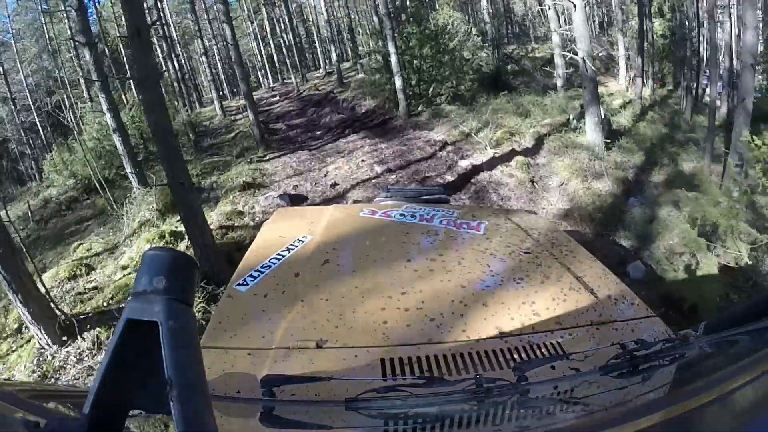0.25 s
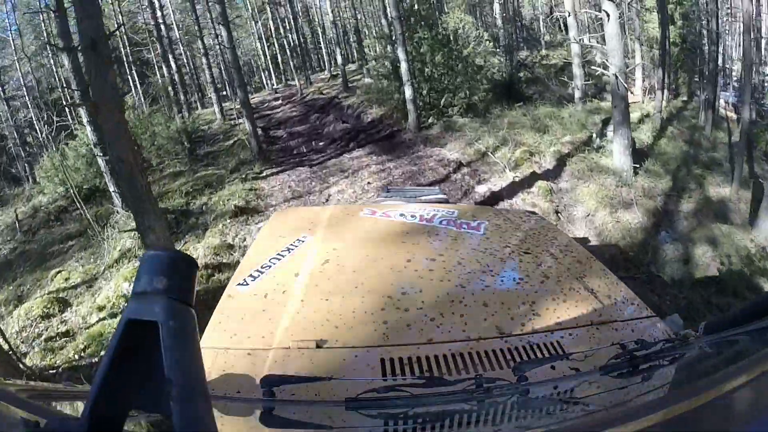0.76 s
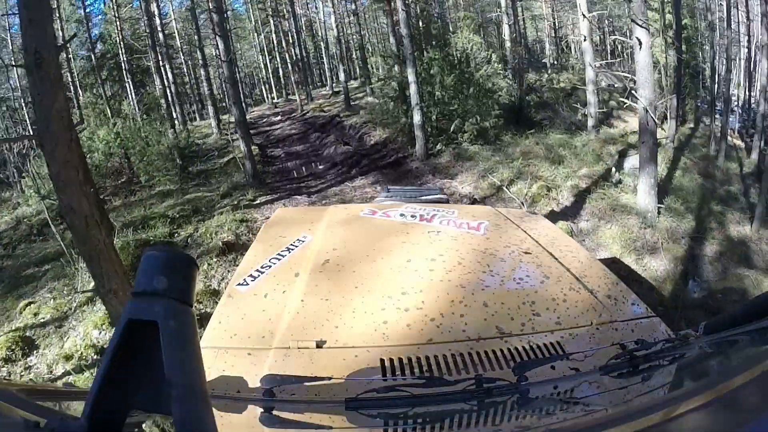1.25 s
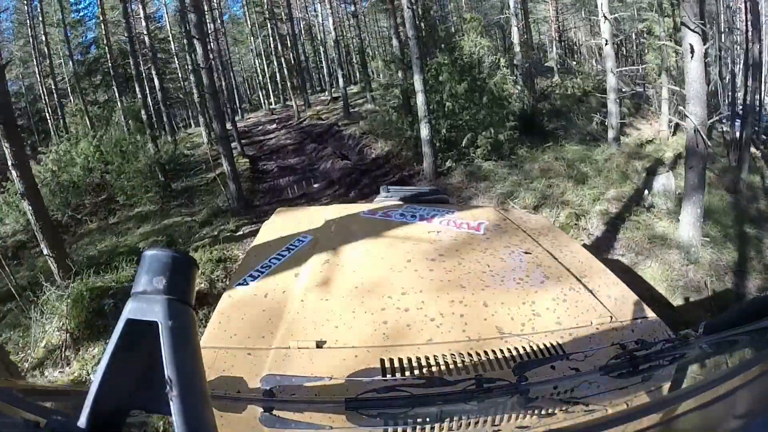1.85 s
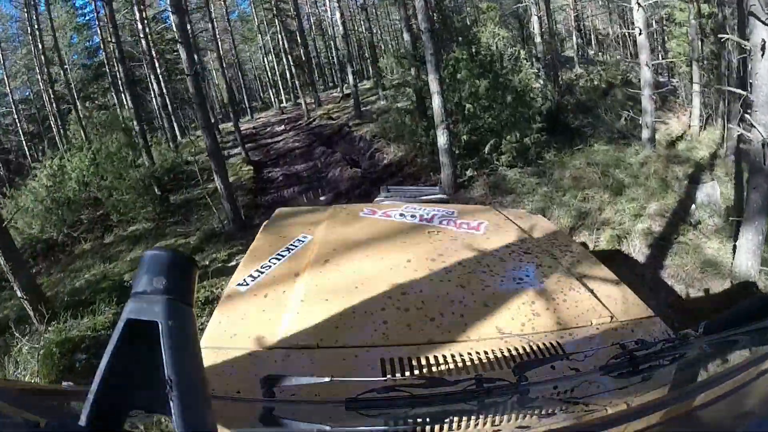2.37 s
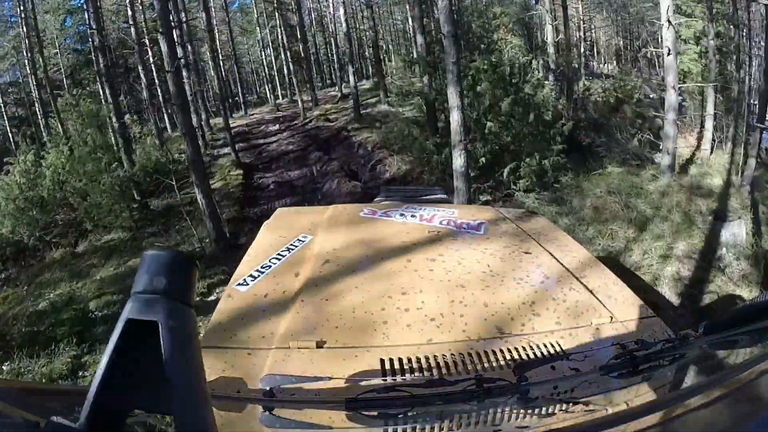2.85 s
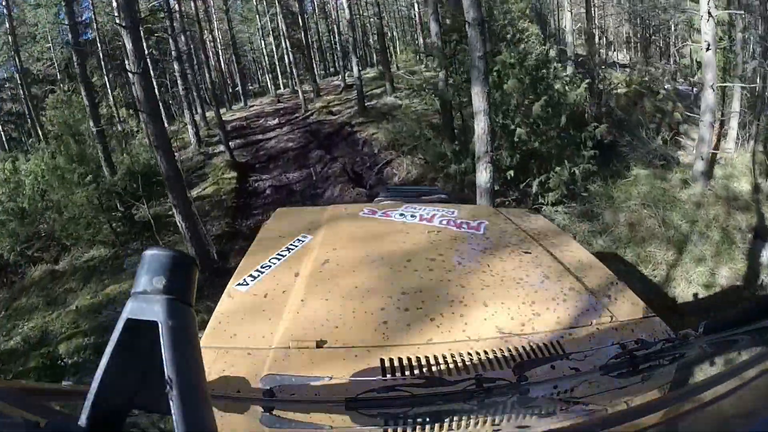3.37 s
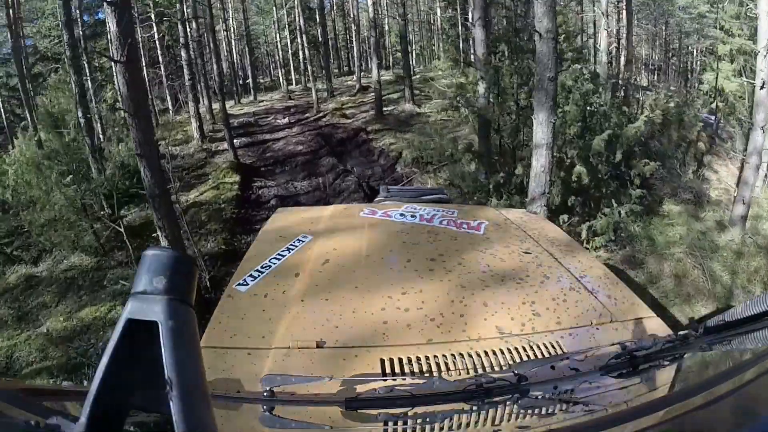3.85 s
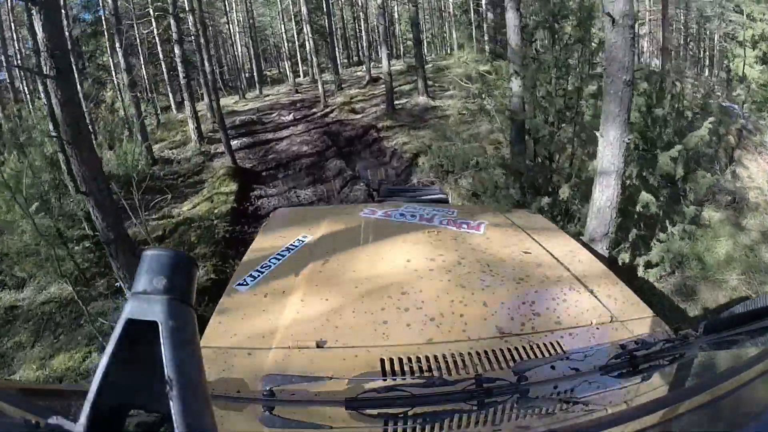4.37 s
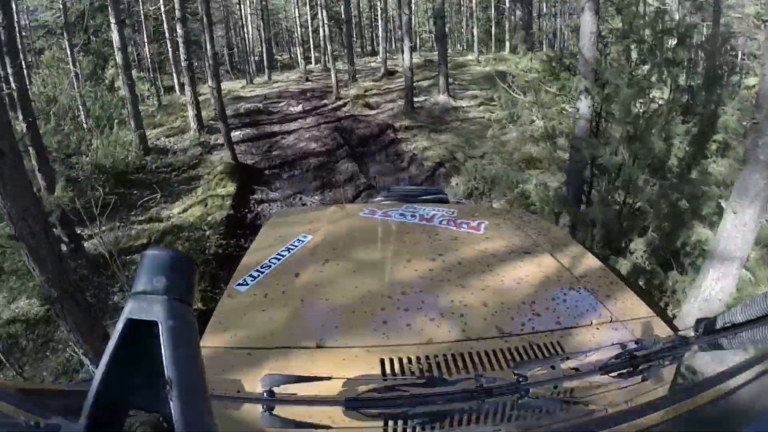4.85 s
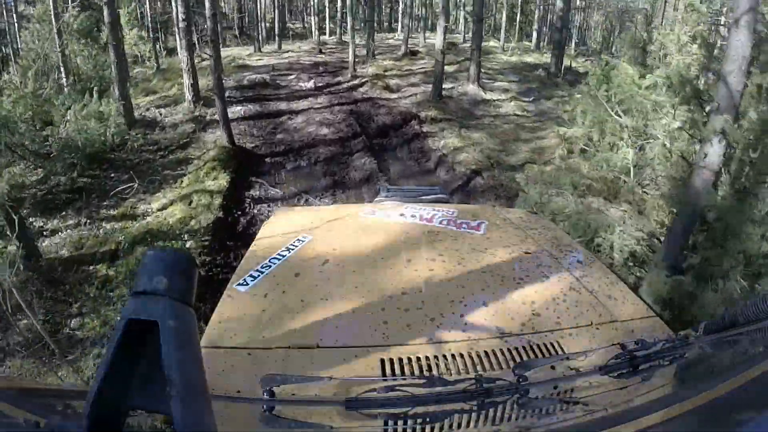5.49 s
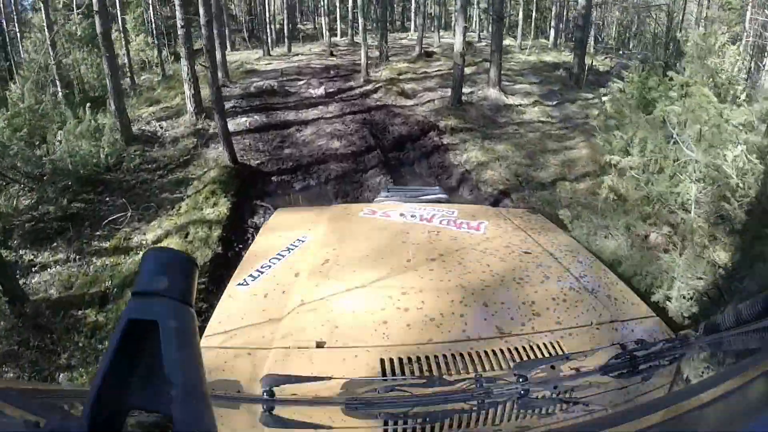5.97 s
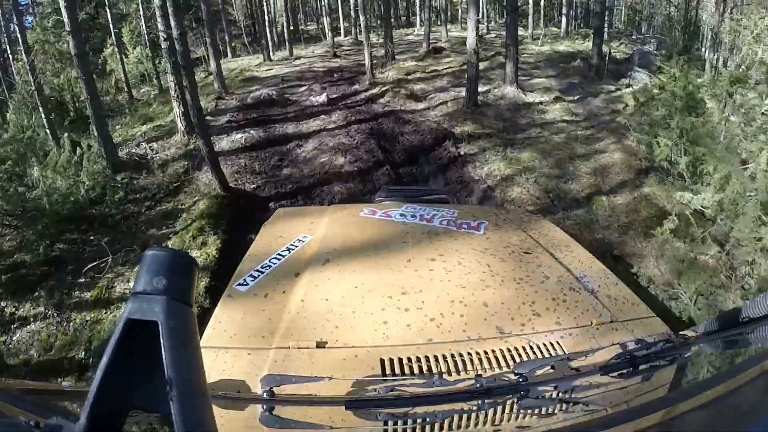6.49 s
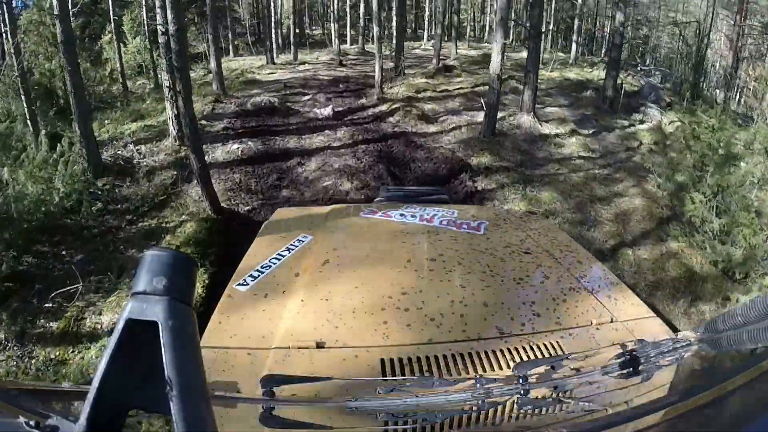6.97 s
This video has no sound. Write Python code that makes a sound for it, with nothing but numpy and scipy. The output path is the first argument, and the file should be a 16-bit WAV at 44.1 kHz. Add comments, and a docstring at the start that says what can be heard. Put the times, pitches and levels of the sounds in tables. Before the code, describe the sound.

Heard close from behind the bonnet, a small four-cylinder engine drones steadily with ticking valves and a light hiss. The body booms over ruts, a fitting rattles and a loose panel knocks, hardest early on and just before four seconds. Brakes sing faintly now and then. Near the end the engine lugs down to a deeper, booming note, then picks up again.

```python
"""A small four-cylinder off-roader crawls along a rutted forest track, heard from behind the bonnet.
From the start the engine drones in sine orders, its valve gear ticks and the cabin booms in shaped noise.
A light fitting rattles and a loose panel knocks and chatters, both as decaying modes; jolts thump low.
Later the brakes sing faintly on wavering sines.
Near the end the engine lugs down into the cabin's resonance, then picks up again."""
import sys
import numpy as np
from scipy import signal
from scipy.fft import rfft, irfft, next_fast_len
from scipy.io import wavfile
from scipy.ndimage import uniform_filter1d, minimum_filter1d, map_coordinates

SR = 44100
rng = np.random.default_rng(int(sys.argv[2]) if len(sys.argv) > 2 else 0)


def generate_wav(sig):
    """Save sig (samples, or channels by samples) to the path in sys.argv[1] as 16-bit PCM at SR."""
    pcm = np.round(np.clip(np.atleast_2d(sig).T, -1, 1) * 32767).astype(np.int16)
    wavfile.write(sys.argv[1], SR, pcm)


N = 318402


def amp(db):
    """Decibels to amplitude."""
    return 10 ** (np.asarray(db) / 20)


def unit(x):
    """x scaled to rms 1."""
    return x / np.sqrt(np.mean(x ** 2) + 1e-20)


def along(points, hz):
    """A spectrum of (Hz, dB) points, interpolated on a log frequency axis."""
    f, v = np.transpose(points)
    return np.interp(np.log(hz + 1), np.log(f + 1), v)


def wobble(rate):
    """A smooth random curve with rate knots a second."""
    knots = rng.standard_normal(int(N * rate / SR) + 4)
    return map_coordinates(knots, [np.arange(N) * rate / SR])


def filtered(x, response):
    """x with its spectrum multiplied by a response of frequency."""
    m = next_fast_len(N + SR // 2)
    hz = np.fft.rfftfreq(m, 1 / SR)
    return irfft(rfft(x, m) * response(hz), m)[:N]


def coloured(x, spectrum, peaks=()):
    """x at rms 1 with a broad spectrum and narrow resonances on top."""
    def response(hz):
        lift_db = sum(db / (1 + (2 * (hz - centre) / width) ** 2) for centre, width, db in peaks)
        return amp(along(spectrum, hz) + lift_db)
    return unit(filtered(x, response))


def blows(times, sizes):
    """A train of impulses."""
    samples = np.clip(np.round(times * SR).astype(int), 0, N)
    return np.bincount(samples, sizes, N + 1)[:N]


def passes(turns, offset):
    """The times at which a count of turns passes each whole number plus offset."""
    return np.interp(np.arange(offset, turns[-1], 1), turns, np.arange(N) / SR)


def tilted(modes, slope_db):
    """The same modes with their balance tilted by slope_db per octave."""
    return [(hz, db + slope_db * np.log2(hz / SR), t60) for hz, db, t60 in modes]


def ring(modes, contact_hz, rise):
    """One blow on a part, peak 1; a softer contact leaves out the high modes."""
    t = np.arange(SR // 8) / SR
    y = sum(amp(db - 60 * t / t60) * np.cos(2 * np.pi * hz * t) for hz, db, t60 in modes)
    # the contact force builds up over rise seconds, so the blow lands as a clunk
    y = y * (1 - np.exp(-t / rise))
    y = signal.sosfilt(signal.butter(6, contact_hz, fs=SR, output="sos"), y)
    return y / np.abs(y).max()


def engine_speed():
    """Firings per second at each moment, sagging near the end as the engine lugs."""
    # engine speed: t/s, firing rate/Hz
    speed_points = [(0, 95.5), (1.25, 95.5), (1.6, 98), (1.95, 104), (2.8, 100), (3.2, 96.2), (3.55, 100.5),
                    (3.9, 96.8), (4.2, 99.5), (4.6, 97.3), (5.3, 88.7), (5.6, 86.7), (6.05, 80),
                    (6.35, 81.2), (6.85, 93), (7.22, 93.5)]
    times, rates = np.transpose(speed_points)
    return np.interp(np.arange(N) / SR, times, rates)


def drone_level(speed):
    """The firing tone grows as its rate nears the cabin resonance; in dB."""
    base_db, cabin_hz, cabin_width_hz, cabin_lift_db = -52, 81.6, 19.7, 21
    # brief swells and dips of the drone: t/s at the centre, length/s, change/dB
    swell_table = [(2.196, 0.15, 11.5), (3.744, 0.35, 11.5), (6.214, 0.19, -4), (6.34, 0.23, 5),
                   (6.459, .08, -26), (6.667, 0.38, 6)]
    t = np.arange(N) / SR
    lift = cabin_lift_db / (1 + (2 * (speed - cabin_hz) / cabin_width_hz) ** 2)
    swells = 0
    for s, length, db in swell_table:
        swells = swells + db * np.cos(np.pi * np.clip((t - s) / length, -.5, .5)) ** 2
    return base_db + lift + swells


def drone(firings, drone_db):
    """A sine just under the firing rate, steadier when loud, and weaker orders from unequal cylinders."""
    # weaker engine orders: multiple of the firing rate, mean level/dB
    order_table = [(.5, -65), (1.5, -67.5), (2, -71), (2.5, -69.5), (3, -68.5), (3.5, -73.5), (4, -85),
                   (4.5, -80)]
    unsteady = np.interp(drone_db, [-46, -33], [1, .35])

    def tone(multiple):
        phase = 2 * np.pi * (multiple * firings + rng.random())
        return np.sqrt(2) * np.sin(phase + 0.11 * unsteady * wobble(11))

    orders = sum(amp(db + 4.0 * wobble(5)) * tone(multiple) for multiple, db in order_table)
    return amp(drone_db + 2 * unsteady * wobble(19)) * tone(0.98) + orders


def at_speed(speed):
    """Murmur, clatter, hiss and rumble in dB at each moment's engine speed."""
    # levels by speed: firing rate/Hz, chassis murmur/dB, valve clatter/dB, belt and fan hiss/dB,
    # spring rumble/dB; murmur and rumble are for smooth ground
    speed_levels = [(80.5, -56.5, -54, -63.5, -70), (89.7, -59, -54, -63.5, -62),
                    (95.7, -56.5, -52.5, -61.6, -58), (105.5, -55.5, -50.5, -59.5, -52.5)]
    rates, *levels = np.transpose(speed_levels)
    return [np.interp(speed, rates, level) for level in levels]


def valves(firings, t60, jitter, count=8):
    """Eight valves seat once a cycle of four firings, each with a decaying noise tick of its own."""
    t = np.arange(SR // 16) / SR
    ticks = np.zeros(N)
    for valve in range(count):
        times = passes(firings / 4, valve / count)
        chance = rng.standard_normal((len(times), 2))
        valve_db = 2 * rng.standard_normal()
        tick = rng.standard_normal(len(t)) * amp(-60 * t / t60 + valve_db)
        seatings = blows(times + jitter * chance[:, 0], amp(1.95 * chance[:, 1]))
        ticks += signal.fftconvolve(seatings, tick)[:N]
    return unit(ticks)


def machinery(firings, murmur_db, clatter_db, hiss_db):
    """Valve ticks and noise that pulses with the engine cycle pass through the bay and the chassis."""
    # spectra before levelling: f/Hz, relative level/dB per Hz
    murmur_spectrum = [(100, -53), (170, -8.5), (210, 3.5), (280, -3), (355, 3), (430, -3), (510, -9.5),
                       (565, 0), (690, 0.5), (760, -9.5), (850, -10), (1100, -10), (2000, -37), (5000, -85)]
    clatter_spectrum = [(300, -33), (800, -28), (1030, -14.5), (1250, 2.5), (1800, 1), (2150, -4),
                        (2650, -2.5), (3100, -8.5), (3500, -5), (3870, -4), (4020, -14.5), (4500, -23.5),
                        (6000, -41.5), (14000, -53)]
    hiss_spectrum = [(2500, -39), (4100, -9), (4480, -10), (4770, -2.5), (5100, -9.5), (5580, -16),
                     (5920, -3), (6330, -2.5), (6700, -13.5), (7050, -16), (8000, -24), (10500, -23.5),
                     (12600, -27), (13400, -34)]
    # engine bay resonances: f/Hz, width/Hz, lift/dB
    bay_peaks = [(1282, 13.4, 10), (1343, 120, -3.5), (1532, 45, 6.5), (1890, 56, 4.5), (2930, 19, 8.5),
                 (3334, 240, 5.5), (3514, 26, 10)]
    # one pulse a cycle and one a firing
    pulsing = amp(0.59 * np.cos(np.pi * firings / 2) + 1.0 * np.cos(2 * np.pi * firings))

    def rush():
        return unit(pulsing * rng.standard_normal(N))

    clatter_source = 1.16 * valves(firings, t60=0.067, jitter=.00004) + rush()
    hiss_source = 0.85 * valves(firings, t60=0.081, jitter=.00002) + rush()
    murmur_source = 0.5 * valves(firings, t60=0.023, jitter=.0001) + rush()
    clatter = amp(clatter_db) * coloured(clatter_source, clatter_spectrum, bay_peaks)
    hiss = amp(hiss_db) * coloured(hiss_source, hiss_spectrum)
    murmur = amp(murmur_db) * coloured(murmur_source, murmur_spectrum)
    return clatter + hiss + murmur


def rocking():
    """Each bump moves the body quickly, then the dampers settle it; in dB over smooth ground."""
    rise_s, settle_s = 0.055, 0.1
    # wheels rolling over bumps: t/s, strength/dB over smooth ground
    bump_table = [(.13, 6.5), (.8, 4.5), (1.15, 7.5), (1.53, 4.5), (2.37, 5.5), (2.62, 4.5), (2.85, 8),
                  (3.37, 4.5), (3.85, 5.5), (4.2, -2), (4.72, 0), (5.58, 6.5), (5.95, 5), (6.8, 3.5)]
    t = np.arange(N) / SR

    def shape(u):
        return np.exp(-np.where(u < 0, u / rise_s, u / settle_s) ** 2)

    return sum(db * shape(t - s) for s, db in bump_table)


def body(boom_db, rumble_db):
    """Rough ground keeps cabin and springs sounding as low noise; jolts add decaying sine thumps."""
    # spectra before levelling: f/Hz, relative level/dB per Hz
    boom_spectrum = [(15, -51), (40, -23), (55, -26), (67, -2), (77, 4.5), (88, -7), (105, -11), (125, -20),
                     (150, -28.5), (200, -43), (400, -91), (900, -120)]
    rumble_spectrum = [(5, -34), (14, -15), (25, 1), (48, -1), (70, -2), (200, -61)]
    # the suspension jolts the body: t/s, f/Hz, level/dB before the onset softens it, t60/s
    jolt_table = [(0.372, 36.4, -27.5, 0.59), (0.391, 74, -11.5, 0.15), (.44, 96.8, -16, 0.26),
                  (1.523, 70.9, -28, 0.94), (2.235, 42, -42, .25)]
    boom = coloured(rng.standard_normal(N), boom_spectrum)
    # the boom flutters quickly, while its slow swells follow the rocking
    boom /= np.sqrt(np.abs(uniform_filter1d(boom ** 2, int(.16 * SR))) + 1e-6)
    y = amp(boom_db) * boom
    y += amp(rumble_db) * coloured(rng.standard_normal(N), rumble_spectrum)
    for s, hz, db, t60 in jolt_table:
        t = np.maximum(np.arange(N) / SR - s, 0)
        onset = 1 - np.exp(-t / 0.0074)
        y += amp(db - 60 * t / t60) * np.sin(2 * np.pi * hz * t) * onset
    return y


def fitting(count=3):
    """Each rattle is a modal contact and two quick, weaker rebounds."""
    # modes of the light fitting: f/Hz, relative level/dB, t60/s
    fitting_modes = [(626, -9, 0.056), (1000, -15, 0.068), (1200, -6.5, 0.054), (1520, 3, 0.036),
                     (1610, -3.5, 0.03), (1767, 8.5, 0.0099), (2040, -5, 0.028), (2510, -7, 0.027),
                     (3240, -18.5, 0.033), (4050, -18, .03), (5750, -17.5, 0.021)]
    # rattles: t/s, level/dB (the first contact peaks 3 dB higher), brightness/dB per octave
    rattle_table = [(0.005, -31.5, 0.5), (0.113, -35, 0), (0.181, -33.5, 5), (0.226, -34.5, 2),
                    (0.311, -40, -3), (1.064, -31.5, 3), (1.093, -29.5, -1.5), (1.117, -34.5, -2),
                    (1.491, -34, 1), (2.489, -38.5, -2), (2.509, -40, 5), (2.81, -37.5, -3),
                    (2.881, -35.5, 0), (3.291, -31, 0.5), (3.306, -38.5, 5.5), (4.76, -41.5, 0),
                    (6.308, -36.5, 2), (6.396, -31, -4.5), (7.004, -38, 1)]
    y = np.zeros(N + SR)
    for s, db, bright_db in rattle_table:
        for bounce in range(count):
            # the point of contact wanders, so each bounce rings differently
            struck = tilted(fitting_modes, bright_db)
            modes = [(hz, level + 2 * rng.standard_normal(), t60) for hz, level, t60 in struck]
            tick = ring(modes, contact_hz=5840, rise=0.00043)
            at = s + .0005 + bounce * 0.0043 * (1 + 0.4 * rng.uniform(-0.8, 1))
            y[int(at * SR):][:len(tick)] += amp(db + 3.0 - 3.1 * bounce) * tick
    return y[:N]


def panel(firings):
    """Modal knocks, brighter when harder, over a buzz timed by the firings and random light taps."""
    knock_scatter_db, buzz_jitter_s, buzz_scatter_db = 1.0, .0025, 2
    # modes of the loose panel: f/Hz, relative level/dB, t60/s
    panel_modes = [(210, -24, .05), (335.7, -13, 0.097), (571, -11, 0.13), (690.3, -5, 0.058),
                   (1050, -17.5, 0.062), (1206, -3.5, 0.066), (1342, -4, 0.039), (1468, 6.5, 0.033),
                   (1626, -5.5, 0.091), (1702, 2, 0.022), (1802, -3.5, 0.039), (2028, 3, 0.029),
                   (2204, 3.5, 0.022), (2405, -7, 0.032), (2626, -12.5, 0.067), (3000, -14, 0.03)]
    # knocks: t/s, peak level/dB ahead of the notches
    knock_table = [(0.093, -31), (0.391, -19), (0.54, -30), (0.584, -24.5), (0.818, -38), (1.368, -39),
                   (1.473, -21), (1.946, -29.5), (2.03, -36.5), (2.054, -35), (2.186, -23.5), (2.237, -18),
                   (2.386, -37.5), (2.54, -35.5), (2.721, -40), (2.891, -24), (2.994, -32.5), (3.054, -39),
                   (3.464, -27), (3.701, -18.5), (3.841, -15), (4.083, -30.5), (4.116, -36), (5.277, -35.5),
                   (5.519, -33), (5.598, -40.5), (5.649, -42), (5.71, -40), (5.944, -34), (5.957, -31),
                   (6.017, -42.5), (6.193, -29.5), (6.253, -34), (6.31, -24.5), (6.465, -32.5),
                   (6.756, -38.5), (6.861, -39), (6.89, -37.5), (7.073, -29), (7.111, -21.5)]
    # the panel buzzing against its stop: start t/s, end t/s, mean contact level/dB ahead of the notches
    chatter_table = [(0.11, 0.231, -47.5), (2.486, 2.56, -43), (2.711, 2.763, -39.5), (5.051, 5.1, -49),
                     (5.575, 5.727, -54.5), (6.225, 6.381, -40)]
    # notches where the panel radiates poorly: f/Hz, Q
    node_table = [(480, 7.1), (860, 8.3)]
    y = np.zeros(N + SR)
    for s, db in knock_table:
        struck = tilted(panel_modes, slope_db=np.interp(db, [-32, -15], [-1, 1]))
        modes = [(hz, level + knock_scatter_db * rng.standard_normal(), t60) for hz, level, t60 in struck]
        knock = ring(modes, contact_hz=np.interp(db, [-32, -15], [2200, 3000]), rise=0.00038)
        y[int((s + .0006) * SR):][:len(knock)] += amp(db) * knock
    # where it lies lightly on its stop, each firing shakes it once
    times = passes(firings, 0)
    chance = rng.standard_normal((len(times), 2))
    sizes = sum(amp(db) * (times > start) * (times < end) for start, end, db in chatter_table)
    buzz = blows(times + buzz_jitter_s * chance[:, 0], sizes * amp(buzz_scatter_db * chance[:, 1]))
    # small bumps tap it at random, eight times a second on average
    taps = rng.random((int(8 * N / SR), 2))
    buzz += blows(taps[:, 0] * N / SR, amp(-46.0 - 12 * taps[:, 1]))
    soft = ring(tilted(panel_modes, slope_db=-5.0), contact_hz=2245, rise=0.00098)
    y = y[:N] + signal.fftconvolve(buzz, soft)[:N]
    for hz, q in node_table:
        y = signal.lfilter(*signal.iirnotch(hz, q, SR), y)
    return y


def brakes():
    """A dragging pad sings briefly on one wavering note, a sine that swells and fades."""
    # brakes rubbing faintly: start t/s, end t/s, f/Hz, mean level/dB at the height of the swell
    squeal_table = [(1.55, 1.8, 1300, -59), (2.25, 2.618, 1297, -55), (4.05, 4.35, 1316, -53.5),
                    (6.198, 6.394, 1416, -48.5)]
    t = np.arange(N) / SR
    y = np.zeros(N)
    for start, end, hz, db in squeal_table:
        swell = np.sin(np.pi * np.clip((t - start) / (end - start), 0, 1))
        note = np.sin(2 * np.pi * hz * t + 0.45 * wobble(27))
        y += amp(db + 1.8 * wobble(30)) * swell * note
    return y


def limited(x):
    """A limiter: a loud moment turns the gain down; it holds, then creeps back."""
    limit_db, hold_s, recover_db_per_s = -22.5, 0.29, 11.5
    power = np.abs(uniform_filter1d(x ** 2, size=SR // 100))
    level_db = 10 * np.log10(power + 1e-12)
    hold = int(hold_s * SR)
    # the origin makes the hold look back only
    needed_db = minimum_filter1d(np.minimum(limit_db - level_db, 0), hold,
                                 mode="constant", origin=(hold - 1) // 2)
    recovery_db = recover_db_per_s * np.arange(N) / SR
    gain_db = np.minimum.accumulate(needed_db - recovery_db) + recovery_db
    return x * amp(gain_db)


def scene():
    """Engine speed and bumps set the levels of engine and body; loose parts and brakes join in."""
    # cabin boom on smooth ground; the shares of a bump that reach the springs and the chassis
    smooth_boom_db, spring_share, chassis_share = -43, .8, 0.27
    speed = engine_speed()
    firings = np.cumsum(speed) / SR
    bump_db = rocking()
    murmur_db, clatter_db, hiss_db, rumble_db = at_speed(speed)
    engine = drone(firings, drone_level(speed))
    engine += machinery(firings, murmur_db + chassis_share * bump_db, clatter_db, hiss_db)
    cabin = body(smooth_boom_db + bump_db, rumble_db + spring_share * bump_db)
    return (engine + cabin + fitting() + panel(firings) + brakes())[None]


def record(dry):
    """Loud moments are limited, and nothing above the band limit is kept."""
    top_hz = 14100
    return filtered(limited(dry[0]), lambda hz: hz < top_hz)[None]


dry = scene()
out = record(dry)
generate_wav(out)
```